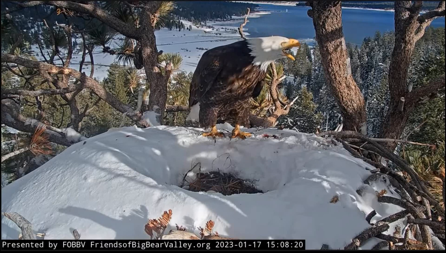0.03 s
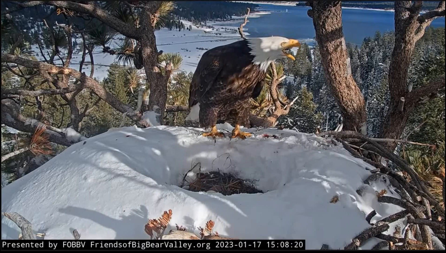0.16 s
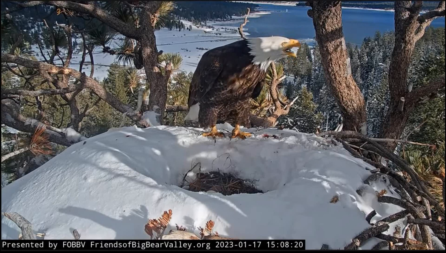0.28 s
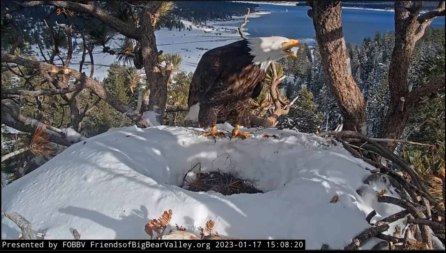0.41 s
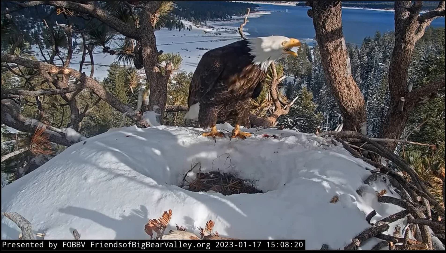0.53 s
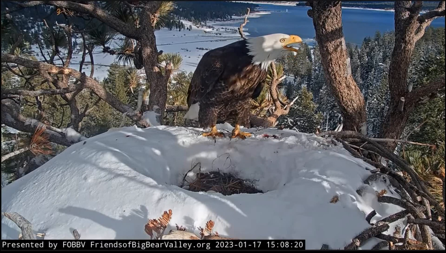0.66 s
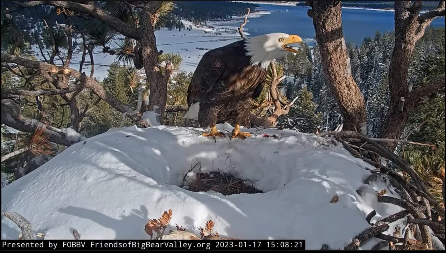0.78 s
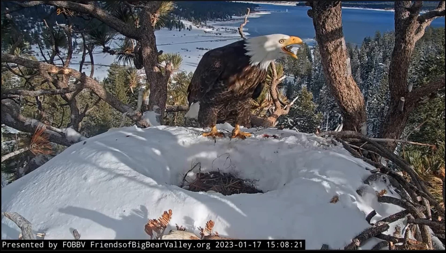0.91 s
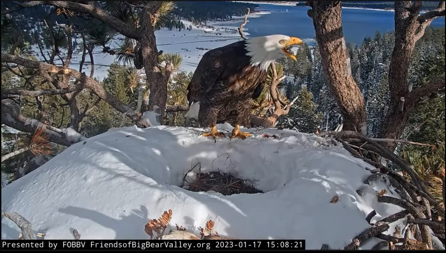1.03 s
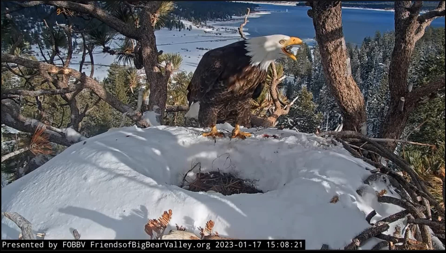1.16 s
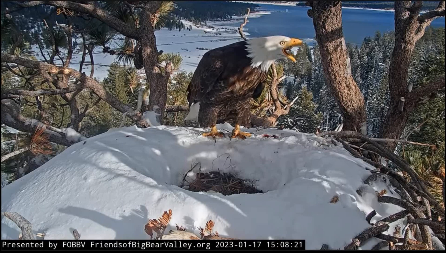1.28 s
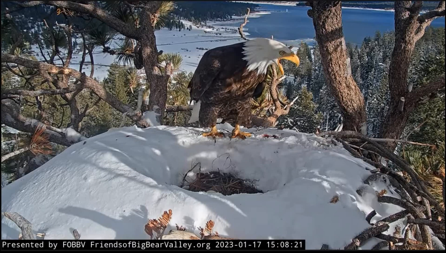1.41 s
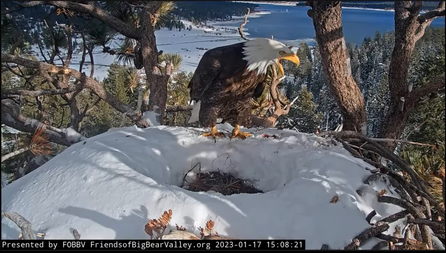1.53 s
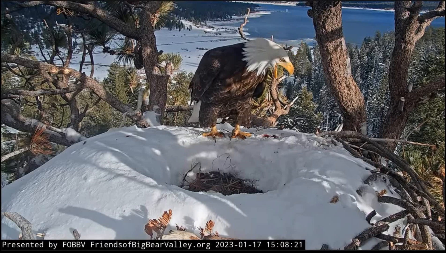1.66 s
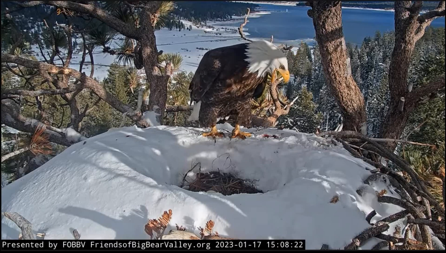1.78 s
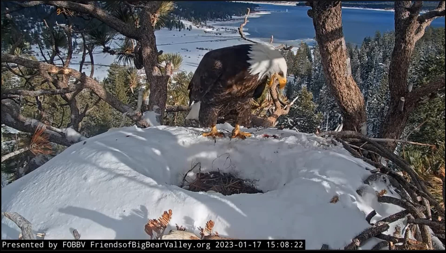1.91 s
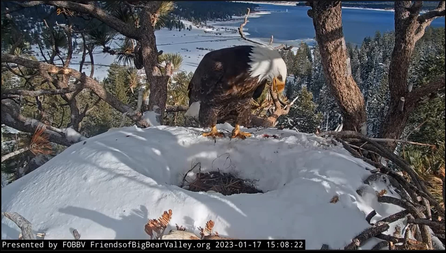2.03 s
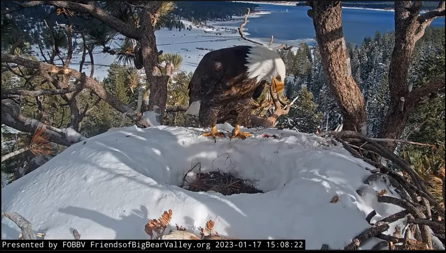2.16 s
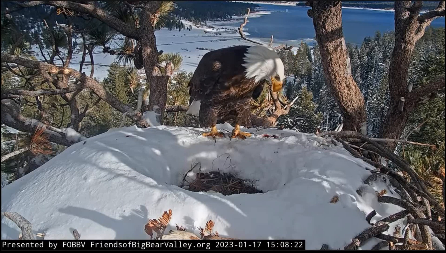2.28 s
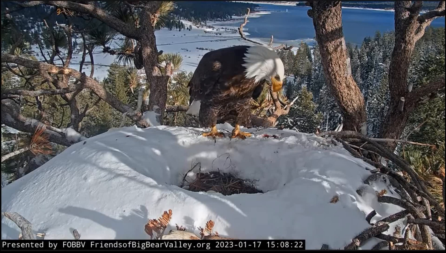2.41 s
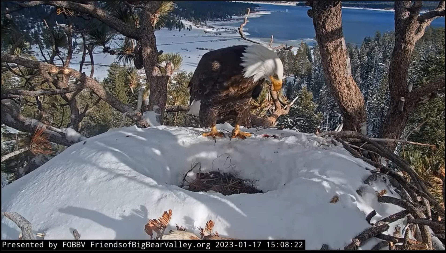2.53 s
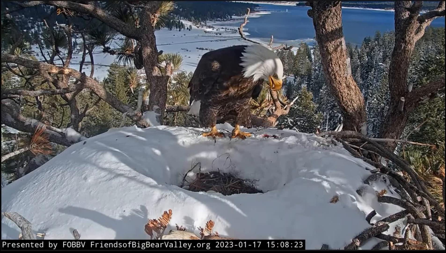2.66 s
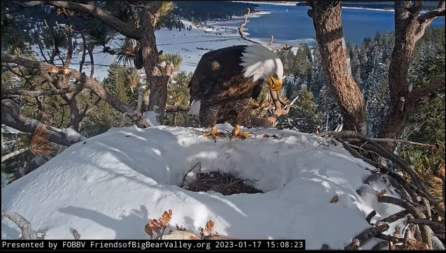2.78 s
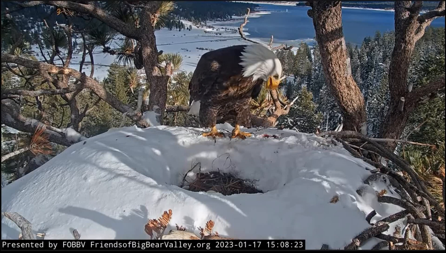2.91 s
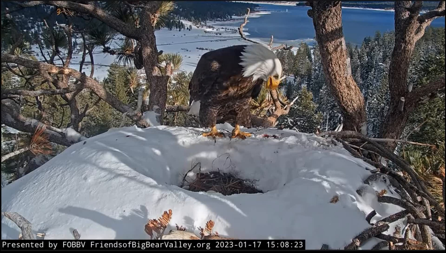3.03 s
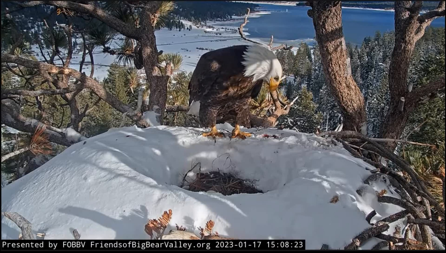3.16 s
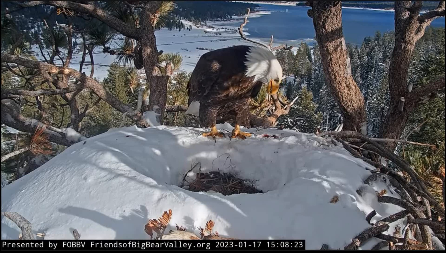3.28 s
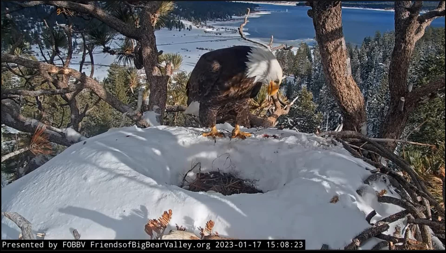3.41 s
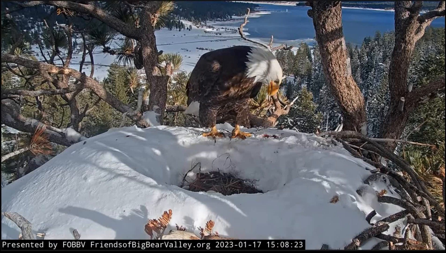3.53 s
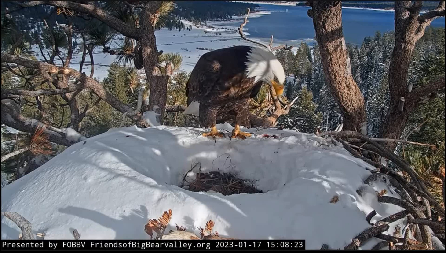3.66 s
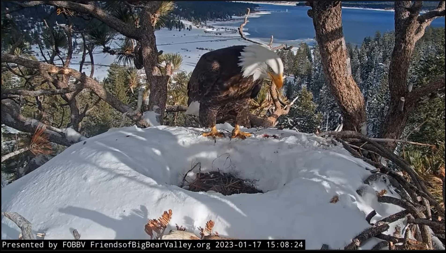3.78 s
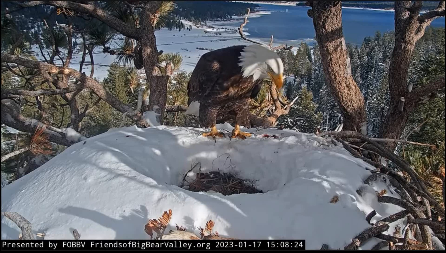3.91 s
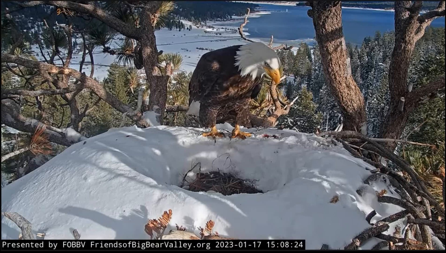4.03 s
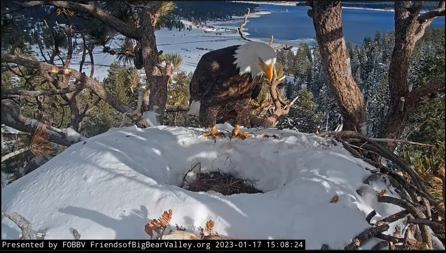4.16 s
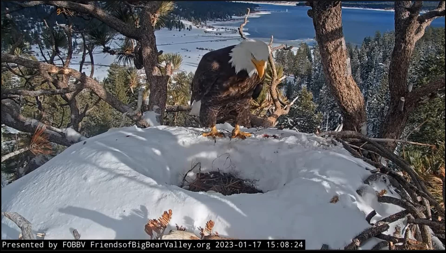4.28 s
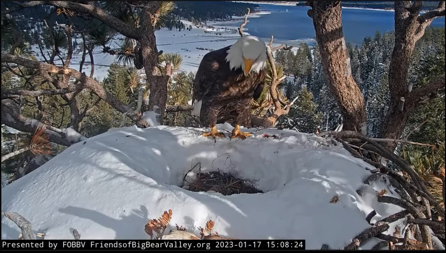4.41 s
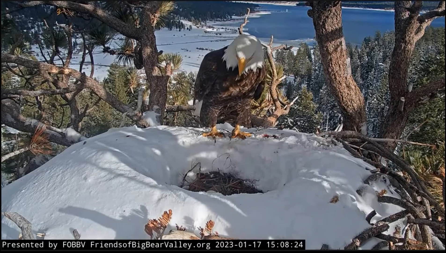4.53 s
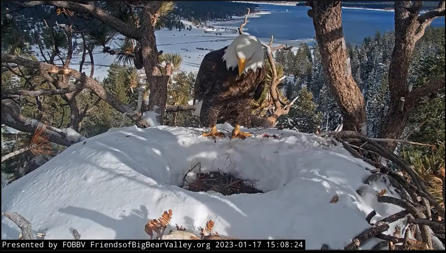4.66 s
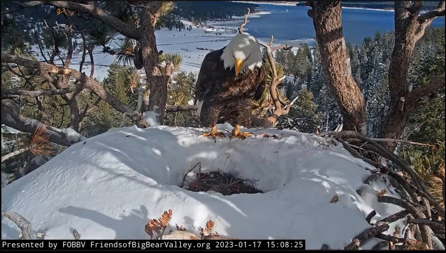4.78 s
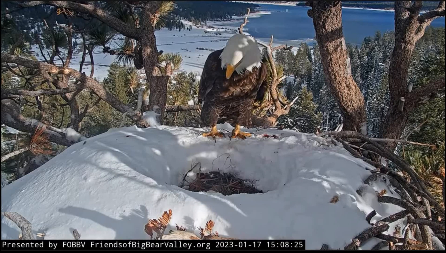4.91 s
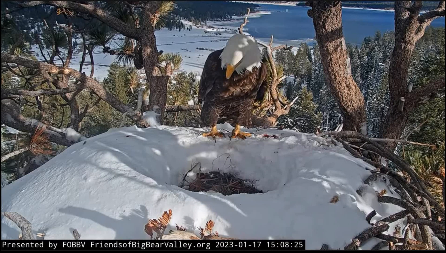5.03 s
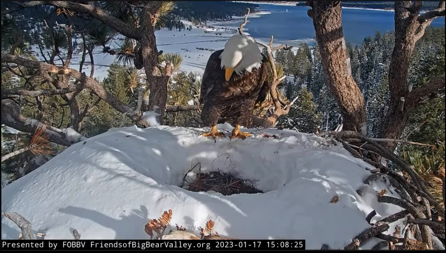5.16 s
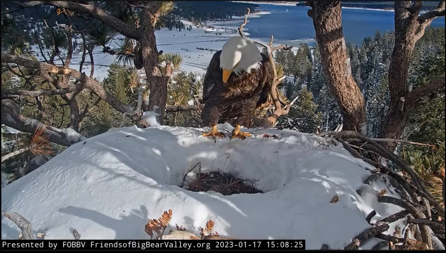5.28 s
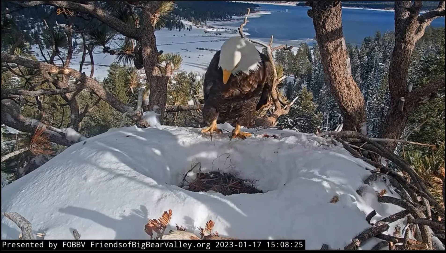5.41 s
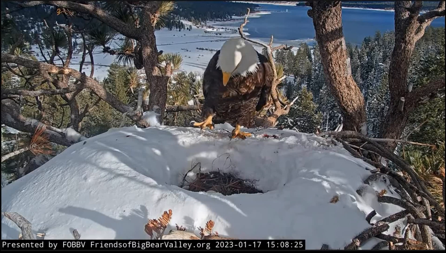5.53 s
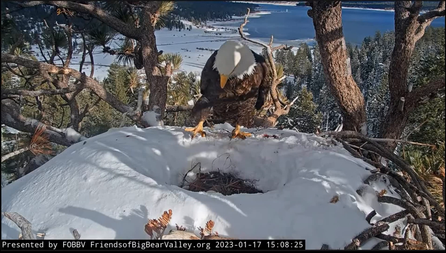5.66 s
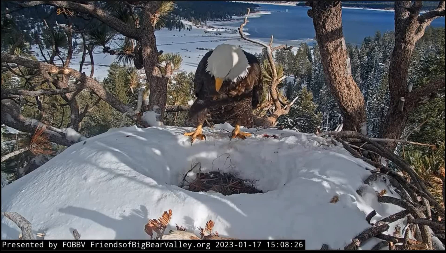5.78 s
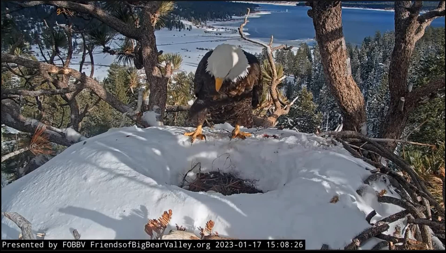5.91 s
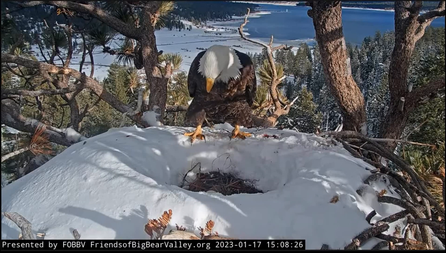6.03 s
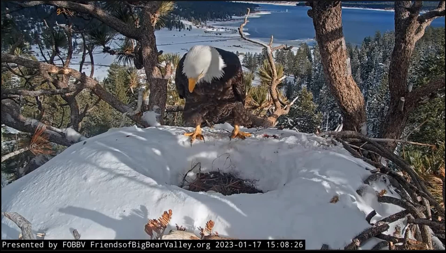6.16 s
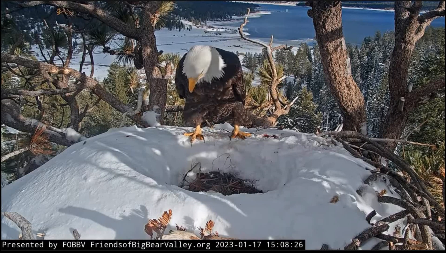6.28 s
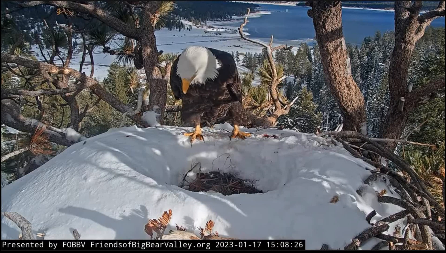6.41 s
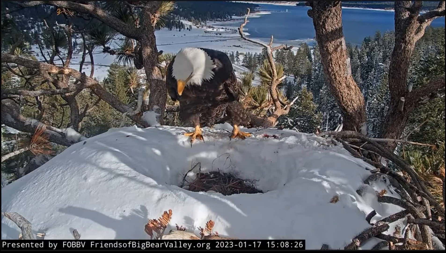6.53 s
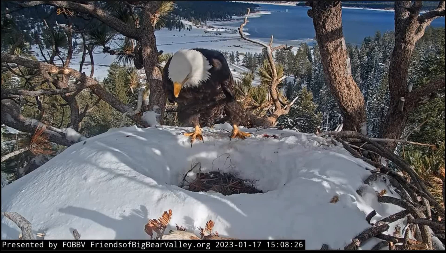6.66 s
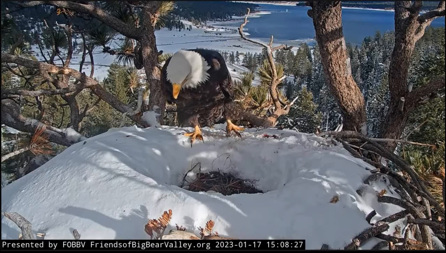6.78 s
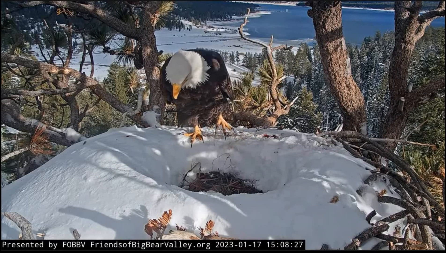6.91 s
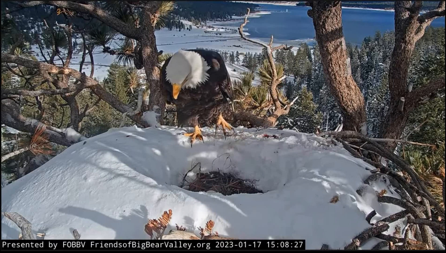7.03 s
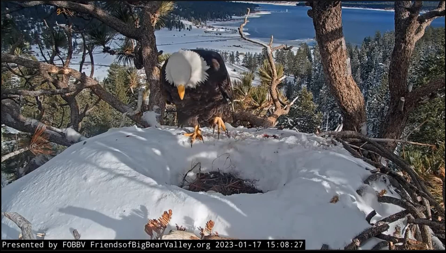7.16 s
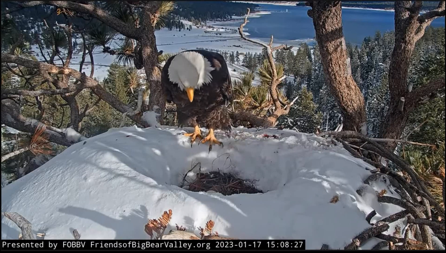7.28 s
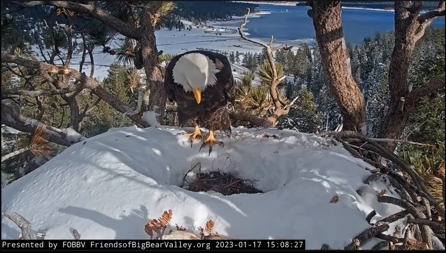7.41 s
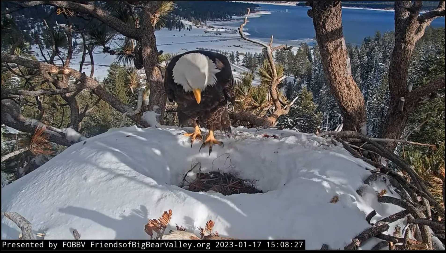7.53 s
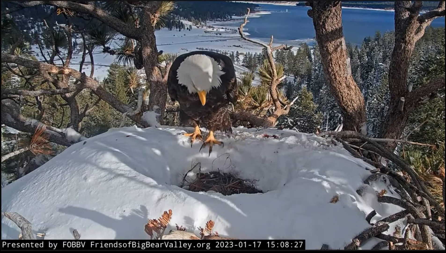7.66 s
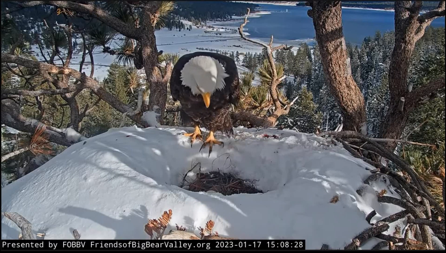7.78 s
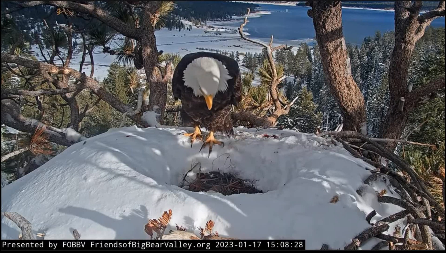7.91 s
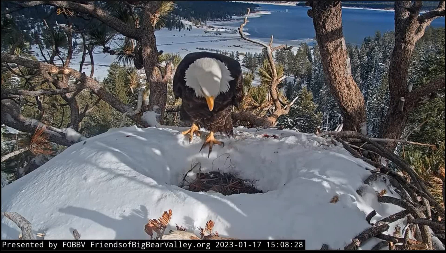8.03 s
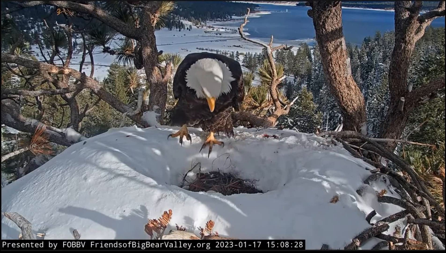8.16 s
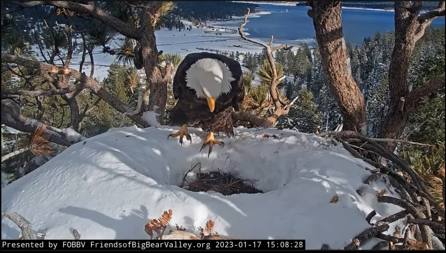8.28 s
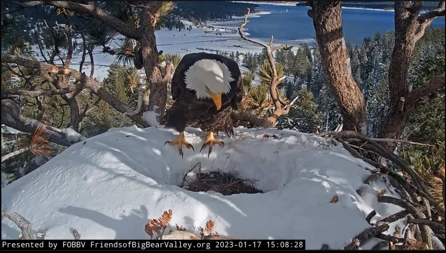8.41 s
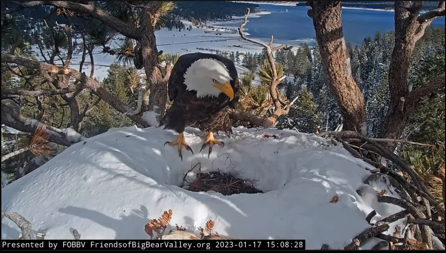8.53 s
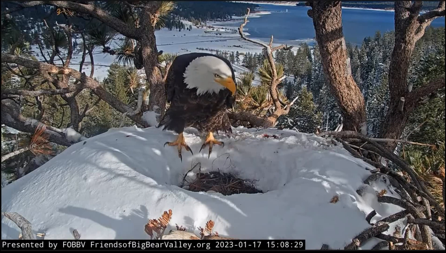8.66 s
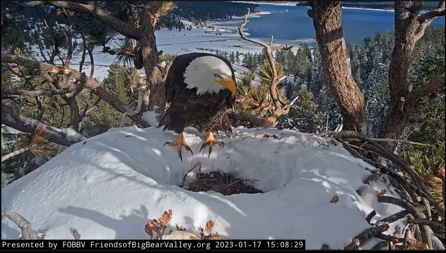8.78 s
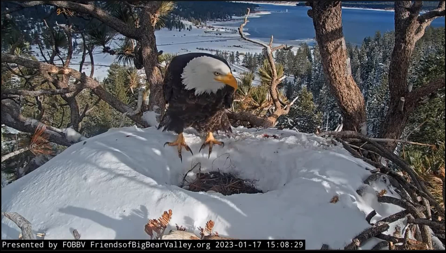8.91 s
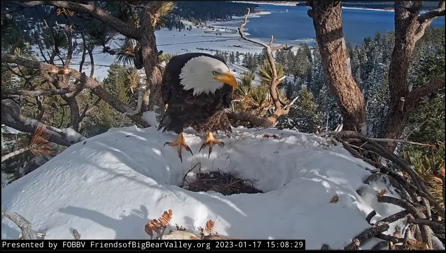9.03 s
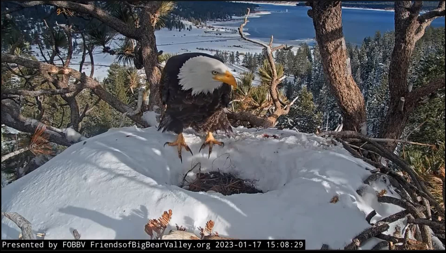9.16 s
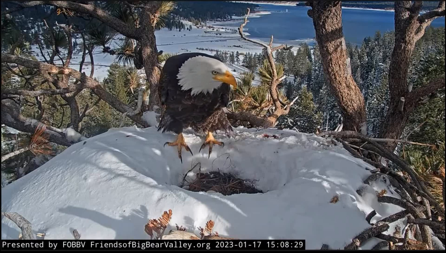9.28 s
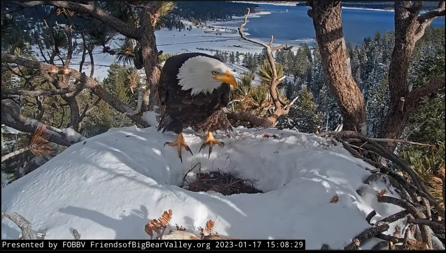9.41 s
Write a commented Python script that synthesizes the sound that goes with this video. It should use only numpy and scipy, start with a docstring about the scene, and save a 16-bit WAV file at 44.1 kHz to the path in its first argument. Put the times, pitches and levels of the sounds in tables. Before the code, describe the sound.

A bald eagle close by on a snowy treetop nest ends a call: a very loud, clipping whistle, then about six short hoarse chitters with squeaky whistles, descending and finished within a second. A faint outdoor echo follows. Afterwards there is a steady hollow air hiss with low rumble and faint hum, a soft dull knock, vague distant low drones and a tiny dry twig tick. The outdoor microphone sounds boxy and overloads.

```python
"""Soft air rush and low rumble come first; almost at once an eagle on its snowy nest in a pine ends a call.
Its shrill whistles are gliding sine tones; its hoarse chitters are rough pulses ringing in the throat.
Shaped noise makes the air in the resonant microphone housing and the rumble; sines make drones and mains hum.
Fading sines make a low thump as the loud whistle overloads the input, later a dull knock and a twig's tick.
The loudest whistles overload the converter, and a treble hiss swells with loud notes."""
import sys
import numpy as np
from scipy import signal
from scipy.fft import rfft, irfft, next_fast_len
from scipy.io import wavfile
from scipy.ndimage import uniform_filter1d, map_coordinates

SR = 44100
rng = np.random.default_rng(int(sys.argv[2]) if len(sys.argv) > 2 else 0)


def bounce(signal):
    """Save signal as a 16-bit WAV file at the path given by the first command-line argument."""
    frames = np.transpose(np.atleast_2d(signal))
    limited = np.clip(frames, -1, 1)
    pcm = np.round(limited * 32767).astype(np.int16)
    wavfile.write(sys.argv[1], SR, pcm)


N = 419391  # length in samples


def amp(db):
    """Gain of a level in dB."""
    return 10 ** (np.asarray(db) / 20)


def unit(x):
    """x scaled to an rms of 1."""
    return x / np.sqrt(np.mean(x ** 2) + 1e-20)


def along(points, hz):
    """Reads a curve of (Hz, value) points on a log frequency axis."""
    point_hz, value = np.transpose(points)
    return np.interp(np.log(hz + 1), np.log(point_hz + 1), value)


def curves(rows):
    """One value per sample for each column after the time."""
    times, *columns = np.transpose(rows)
    return [np.interp(np.arange(N) / SR, times, column) for column in columns]


def wobble(rate):
    """A smooth random curve through `rate` random points a second."""
    points = rng.standard_normal(int(N * rate / SR) + 4)
    return map_coordinates(points, [np.arange(N) * rate / SR])


def filtered(x, response):
    """x with each frequency multiplied by response(Hz)."""
    size = next_fast_len(len(x) + 8192)
    return irfft(rfft(x, size) * response(np.fft.rfftfreq(size, 1 / SR)), size)[:len(x)]


def noise(spectrum):
    """Random noise coloured by (Hz, dB) points, at rms 1."""
    return unit(filtered(rng.standard_normal(N), lambda hz: amp(along(spectrum, hz))))


def resonate(x, hz, width):
    """x through one resonance three times over, which makes its slopes steep, at rms 1."""
    return unit(filtered(x, lambda f: (1j * f * width / (hz * hz - f * f + 1j * f * width)) ** 3))


# colour of the air in the microphone housing: pitch_hz [Hz], level_db [dB per Hz, relative]
AIR_COLOUR = [(110, -20), (190, -9), (221, -14.5), (347, -17), (488, -10), (778, -12.5), (1010, -9.5),
              (1330, 1), (1520, -1.5), (2170, -16), (2810, -15.5), (3460, -6.5), (4020, -15), (4540, -26.5),
              (5000, -40.5), (6500, -83), (11000, -120)]


def air_rush():
    """Air rushing in the housing: noise that its resonances colour, slightly unsteady."""
    level_db = -35 + 0.26 * wobble(1.5) + 0.56 * wobble(30)
    return amp(level_db) * noise(AIR_COLOUR)


# colour of the rumble: pitch_hz [Hz], level_db [dB per Hz, relative]
RUMBLE_COLOUR = [(30, -39.5), (46, -20.5), (72, -2.5), (119, 2), (147, 0.5), (204, -15), (250, -16),
                 (320, -28), (550, -120)]
# loudness of the rumble before its waver: time_s [s], level_db [dB]
RUMBLE_LEVEL = [(0, -40.5), (.9, -46.5), (1.25, -43), (1.8, -45.5), (3, -49), (5.6, -48.5), (8.5, -46.5),
                (9.5, -46.5)]


def low_rumble():
    """Deep noise whose level drifts slowly and wavers."""
    level_db = curves(RUMBLE_LEVEL)[0] + 1.93 * wobble(6)
    return amp(level_db) * noise(RUMBLE_COLOUR)


# mains hum, one pair: pitch_hz [Hz], level_db [dB rms]
HUM = (60, -51.5)


def mains_hum():
    """One steady sine at the mains frequency."""
    hz, level_db = HUM
    return amp(level_db) * np.sqrt(2) * np.sin(2 * np.pi * hz * np.arange(N) / SR)


# two far drones, before their waver: time_s [s], pitch_hz [Hz], level_db [dB rms]
LOWER_DRONE = [(5.7, 103.6, -47.5), (6.27, 102, -53), (6.36, 113.6, -42.5), (6.6, 106, -55.5),
               (6.87, 115, -41), (7.05, 112, -55), (7.2, 112, -38.5), (7.4, 112, -46.5), (7.6, 113.5, -43),
               (8.3, 118, -62), (8.6, 119.4, -49.5), (8.95, 125, -45), (9.5, 134.3, -47)]
UPPER_DRONE = [(5.75, 172.6, -63), (6.05, 168.7, -46.5), (6.17, 170, -65), (6.3, 169.5, -46.5),
               (6.7, 167, -63)]


def drone(rows):
    """A far low tone: a sine that fades in and out and wavers in pitch and level."""
    hz, level_db = curves(rows)
    t = np.arange(N) / SR
    fade_in = np.clip((t - rows[0][0]) / 0.18, 0, 1)
    fade_out = np.clip((rows[-1][0] - t) / 0.145, 0, 1)
    level = amp(level_db + 2 * wobble(7.4))
    phase = 2 * np.pi * np.cumsum(hz + 1.38 * wobble(5.4)) / SR
    return fade_in * fade_out * level * np.sqrt(2) * np.sin(phase)


def background():
    """Everything around the bird that is not a short event: air, rumble, drones and hum."""
    return air_rush() + low_rumble() + drone(LOWER_DRONE) + drone(UPPER_DRONE) + mains_hum()


# the twig's tick: start_s [s], level_db [dB at the start]
TICKS = [(7.8917, -33)]


def twig():
    """A dry tick, all treble: a very high sine that dies within about a millisecond."""
    out, t = np.zeros(N), np.arange(4000) / SR
    for start_s, level_db in TICKS:
        fade = amp(level_db - 60 * t / .0012)  # 60 dB down in 1.2 ms
        out[round(start_s * SR):][:len(t)] += fade * np.sin(2 * np.pi * 13200 * t)
    return out


# first the low thump as the loud whistle overloads the input, then a faint dull knock:
# start_s [s], level_db [dB before the soft onset], pitch_hz [Hz], t60_s [s to fall 60 dB]
THUMP_AND_KNOCK = [(0.223, -22, 149, 0.063), (2.316, -18, 780, 0.014)]


def thump_and_knock():
    """Each is two fading sines with a soft onset, the upper 1.6 times as high and 4 dB weaker."""
    out, t = np.zeros(N), np.arange(4000) / SR
    for start_s, level_db, hz, t60_s in THUMP_AND_KNOCK:
        envelope = amp(level_db - 60 * t / t60_s) * (1 - np.exp(-t / 0.0022))
        tones = np.sin(2 * np.pi * hz * t) + amp(-4) * np.sin(2 * np.pi * 1.6 * hz * t)
        out[round(start_s * SR):][:len(t)] += envelope * tones
    return out


def forest(x, t60):
    """A faint answer of trunks and snow: the sound smeared by a fading tail of noise."""
    t = np.arange(SR // 4) / SR
    fade = amp(-60 * t / t60) * (1 - np.exp(-t / 0.00595))
    tail = noise([(4200, -8), (5200, -5.5)])[:len(t)] * fade
    return signal.fftconvolve(x[:2 * SR], tail / np.linalg.norm(tail))


# throat resonances: pitch_hz [Hz], width_hz [Hz], level_db [dB], lasts [share of the chitter, 0-1]
THROAT = [(1820, 240, -15, 0.37), (2265, 280, -16.5, 0.23), (3468, 770, -1, 0.97), (4050, 370, -2.5, 1),
          (5170, 600, 0.5, 1), (5610, 340, -0.5, 0.7), (6420, 550, -4.5, 0.63), (7470, 650, -21, 0.542)]
# hoarse chitters: start_s [s], loudest_s [s], end_s [s], level_db [dB before the throat levels],
# brightness_db [dB added to the outer resonances]
CHITTERS = [(0.266, .2755, 0.335, -21, -5), (0.369, .379, 0.42, -22, -1.5), (0.477, 0.49, 0.54, -18, -7),
            (0.589, 0.602, 0.666, -25, -13.5), (0.717, 0.728, 0.76, -21, -33),
            (0.861, 0.8665, 0.9, -22.5, -30)]
LEAD_S, CREST_S, DROP_S = 0.0042, 0.0076, 0.0079  # soft lead-in, loud crest, drop to the rasp [s]


def chitters(rate, scatter, breath, fade_db, rasp_db):
    """Uneven pulses and turbulent air ring in the throat: a quick rise, then a rasp, each band lasting its share."""
    cycles = np.floor(np.cumsum(rate * np.exp(scatter * wobble(200))) / SR)
    pulses = np.diff(cycles, prepend=0) * amp(1.7 * rng.standard_normal(N))
    source = unit(pulses) + breath * rng.standard_normal(N)
    out, t = np.zeros(N), np.arange(SR) / SR  # all chitters fall in the first second
    shared_rasp = wobble(240)[:SR]
    for hz, width_hz, mode_db, lasts in THROAT:
        unevenness_db = rasp_db * (.5 * shared_rasp + wobble(146.7)[:SR])
        band = resonate(source, hz, width_hz)[:SR] * amp(mode_db + unevenness_db)
        outer = abs(hz - 3800) > 800  # a narrower beak dims these
        for start, loudest, end, level_db, brightness_db in CHITTERS:
            tail = lasts * max(end - loudest, 0)
            steps = [start - LEAD_S, LEAD_S, loudest - start - CREST_S / 2, CREST_S,
                     DROP_S, .7 * tail, 0.32 * tail + 0.0022]
            shape_db = [-45, -20, 0, 0, fade_db, fade_db + 2.5, -42]
            envelope_db = np.interp(t, np.cumsum(steps), shape_db, -200, -200)
            out[:SR] += amp(level_db + envelope_db + brightness_db * outer) * band
    return out


# main whistles, one curve each: time_s [s], pitch_hz [Hz], effort_db [dB]
WHISTLES = [
    [(.118, 2580, -40), (.134, 2620, -32), (.142, 2660, -20.5), (.151, 2620, -36.5)],
    [(.157, 3627, -25.5), (.1635, 3680, -12), (.1655, 3670, 2), (.168, 3650, -2), (.172, 3720, -5),
     (.176, 3680, -15), (.182, 3940, -22)],
    [(.161, 4900, -40), (.174, 5200, -31), (.186, 5450, -38)],
    [(.164, 5800, -47), (.176, 6400, -40), (.183, 6600, -38)],
    [(.182, 3760, -14), (.188, 3830, 3), (.196, 3960, 10.5), (.208, 3950, 9), (.226, 3780, 0),
     (.238, 3640, -4), (.243, 3680, -12), (.26, 3604, -34)],
    [(.312, 4040, -10.5), (.316, 4070, -3.5), (.327, 4000, -3.5), (.33, 3770, -13), (.343, 3800, -31)],
    [(.419, 4030, -5), (.423, 4090, 5), (.431, 4050, -3), (.434, 3950, -12), (.438, 3770, -21),
     (.45, 3760, -29)],
    [(.597, 3495, -23.5), (.604, 3450, -9), (.609, 3490, -14), (.633, 3520, -19), (.636, 3430, -3),
     (.64, 3420, -4), (.648, 3500, -18), (.662, 3400, -25)],
    [(.729, 3460, -27), (.736, 3470, -19), (.74, 3385, 2), (.758, 3380, 1), (.767, 3200, -4.5),
     (.771, 3160, -10.5), (.784, 3100, -32)],
    [(.874, 3600, -27), (.881, 3338, 4), (.889, 3256, 0.5), (.896, 3254, 2), (.903, 3280, -10.5),
     (.907, 3130, -8), (.917, 3070, -27.5), (.936, 3210, -36)],
]
# soft level peeps around them: start_s [s], length_s [s], pitch_hz [Hz], level_db [dB before the droop]
PEEPS = [(.125, 0.0094, 1330, -22), (0.143, 0.025, 1310, -21.5), (.162, 0.016, 2345, -22.5),
         (0.165, 0.018, 1407, -19), (.264, .014, 1800, -26.5), (.368, 0.018, 1820, -28.5),
         (0.599, 0.012, 2300, -28), (0.722, 0.011, 2300, -29), (.27, .012, 3420, -17),
         (0.379, .013, 3450, -20.5), (0.478, .014, 3400, -15), (0.412, .012, 5400, -20.5),
         (.284, 0.0149, 5250, -24.5), (0.393, 0.011, 5480, -22), (0.5, 0.013, 5300, -15),
         (0.512, 0.0091, 3590, -14), (0.521, 0.026, 4055, -17), (0.61, 0.033, 5290, -18)]
# moments when the whistle catches: time_s [s], lost [share of the tone, 0-1]
CATCHES = [(0.1948, 0.9), (0.2268, .95), (0.321, .8), (0.3254, 0.42), (.3295, 0.76), (0.43, .5),
           (0.634, .7), (.643, .9), (.647, 0.7), (.748, .6), (0.7637, 0.82), (0.77, .4), (0.242, .6),
           (0.905, 0.7)]
CATCH_S = .0015  # from the middle of a catch to where its depth is down to 37 % [s]


def whistles(rise, fall, droop_db, octave_db, flutter_db, jitter_hz):
    """Near-pure notes follow pitch and effort, slightly unsteady; the octave grows with effort."""
    out, t = np.zeros(N), np.arange(N) / SR
    flutter = amp(flutter_db * wobble(300))
    jitter = jitter_hz * wobble(500)
    octave = amp(octave_db + 3.75 * wobble(880))  # comes and goes quickly
    for time_s, lost in CATCHES:
        flutter = flutter * (1 - lost * np.exp(-((t - time_s) / CATCH_S) ** 2))
    peeps = [[(start, hz, db), (start + length, hz, db - droop_db)] for start, length, hz, db in PEEPS]
    for rows in WHISTLES + peeps:
        at = np.arange(round(rows[0][0] * SR), round(rows[-1][0] * SR))
        note_t = (at - at[0]) / SR
        pitch, effort_db = [curve[at] for curve in curves(rows)]
        phase = 2 * np.pi * (np.cumsum(pitch + jitter[at]) / SR + rng.random())
        edges = np.clip(note_t / rise, 0, 1) * np.clip((note_t[-1] - note_t) / fall, 0, 1)
        effort = amp(effort_db) * np.sin(np.pi / 2 * edges) ** 2 * flutter[at]
        out[at] += effort * (np.sin(phase) + effort ** .5 * octave[at] * np.cos(2 * phase))
    return out


def scene():
    """The bird, its echo and the place, added together."""
    bird = whistles(rise=0.0039, fall=0.002877, droop_db=6.5, octave_db=-33, flutter_db=2.5, jitter_hz=30.47)
    bird = bird + chitters(rate=330, scatter=.35, breath=0.3, fade_db=-13.5, rasp_db=3.2)
    echo = forest(bird, t60=0.4)
    echo = amp(-28.5) * np.pad(echo, (0, N - len(echo)))
    return (bird + echo + background() + twig() + thump_and_knock())[None]


# converter, three whole numbers: up, down [SR * up / down is the analogue stage], step [keep every step-th point]
CONVERTER = (320, 147, 3)
# tone of the output stage: pitch_hz [Hz], gain_db [dB]
TONE = [(3300, -0.5), (3680, -0.8), (4000, -5.5), (4250, -6), (4600, -9), (5200, -6), (6500, -5),
        (9500, -7.5), (11800, 3.5), (13500, 5.5), (16000, -1.5)]
# colour of the circuit hiss: pitch_hz [Hz], level_db [dB per Hz, relative]
HISS_COLOUR = [(2820, -28), (4800, -4), (5290, -1.5), (6500, -9), (9250, -16), (10000, -15.5), (12100, -6),
               (13700, -4.5), (14500, -9), (15200, -21)]
# colour of the treble hiss that swells with loud notes: pitch_hz [Hz], level_db [dB per Hz, relative]
SWELL_COLOUR = [(7000, -39), (9000, -22), (10500, -4), (13000, 6), (15700, -2.5)]


def record(dry):
    """The input clips and some overtones fold back; then tone, two hisses, a constant offset, band limit."""
    up, down, step = CONVERTER
    fine = signal.resample_poly(dry[0], up, down)
    top, knee = amp(-5.0), 6.0  # clipping level, sharpness of the bend
    clipped = fine / (1 + np.abs(fine / top) ** knee) ** (1 / knee)
    smooth = np.repeat(signal.resample_poly(clipped, 1, step), step)[:len(clipped)]
    # a weak filter lets part of the overtones through, and sampling folds them down
    sampled = (smooth + amp(-9.0) * (clipped - smooth))[::step]
    x = signal.resample_poly(sampled, down * step, up)[:N]
    x = filtered(np.pad(x, (0, N - len(x))), lambda hz: amp(along(TONE, hz)))
    hiss = amp(-65) * noise(HISS_COLOUR)
    power = np.abs(uniform_filter1d(np.abs(uniform_filter1d(dry[0] ** 2, 130)), 130))  # over a few ms
    loudness = power ** .95 / (1 + power ** .95)  # nears 1 when very loud
    swelling_hiss = amp(-25.0) * loudness * noise(SWELL_COLOUR)
    return filtered(x + hiss + swelling_hiss + amp(-40), lambda hz: hz < 15850)[None]  # cut from 15850 Hz up


dry = scene()
out = record(dry)
bounce(out)
```